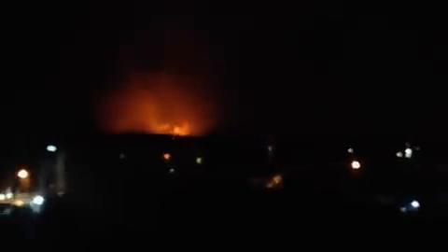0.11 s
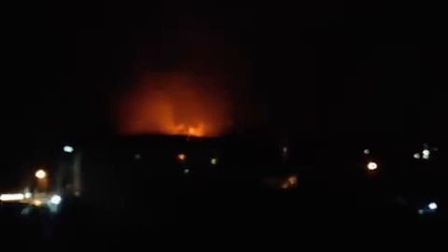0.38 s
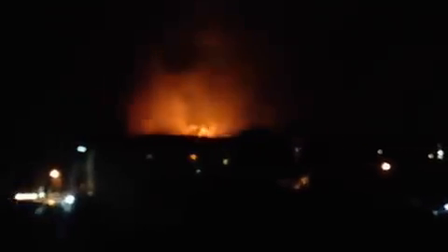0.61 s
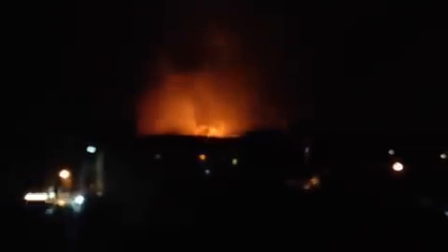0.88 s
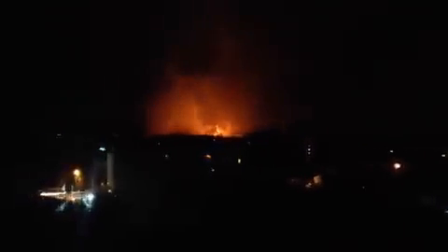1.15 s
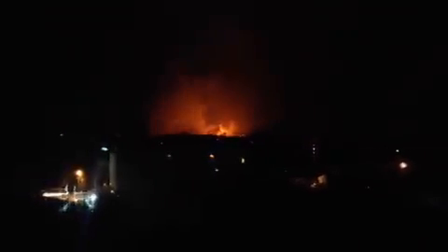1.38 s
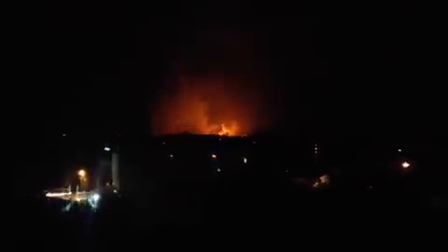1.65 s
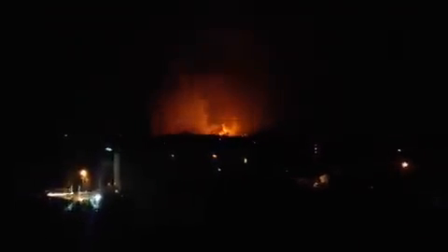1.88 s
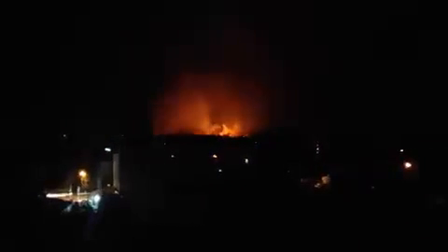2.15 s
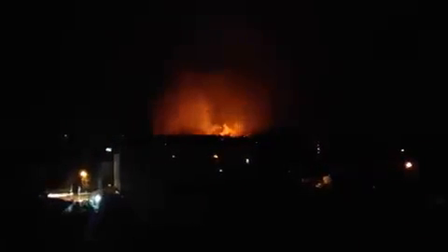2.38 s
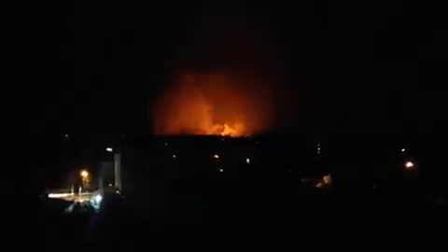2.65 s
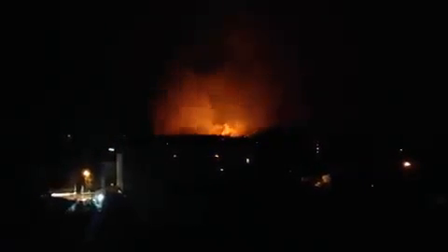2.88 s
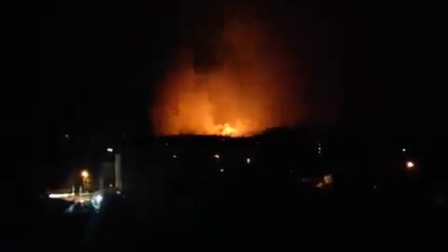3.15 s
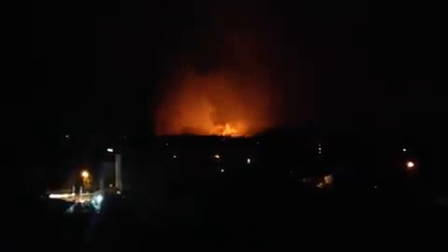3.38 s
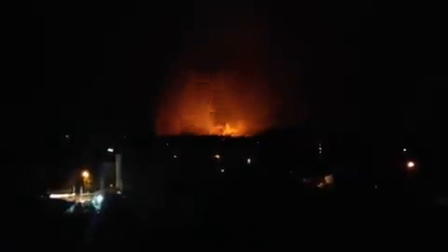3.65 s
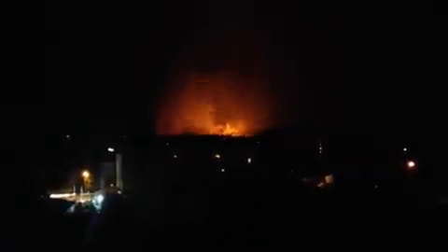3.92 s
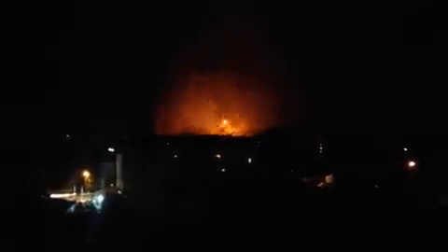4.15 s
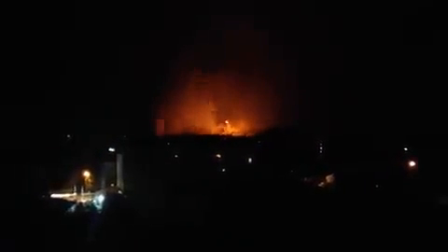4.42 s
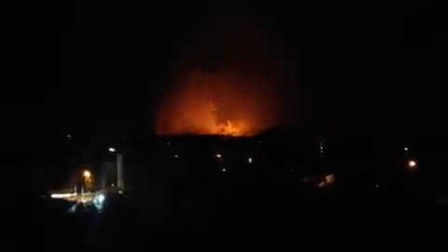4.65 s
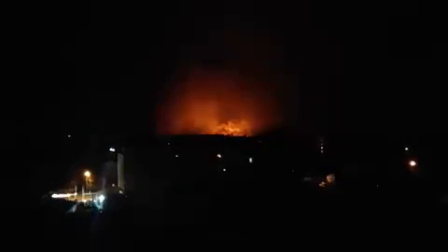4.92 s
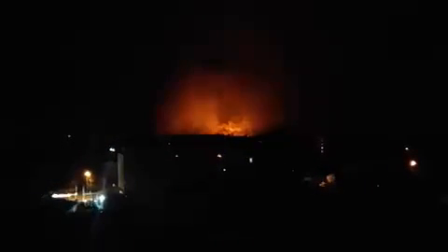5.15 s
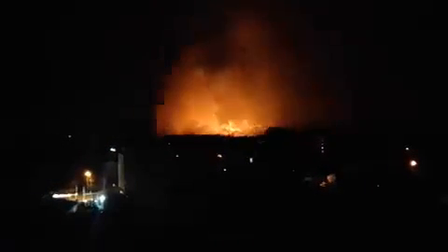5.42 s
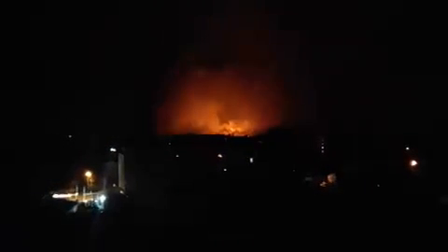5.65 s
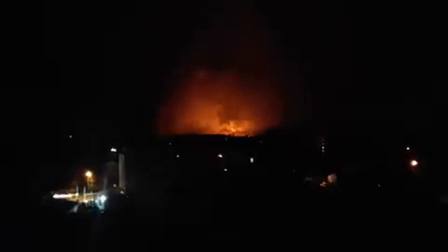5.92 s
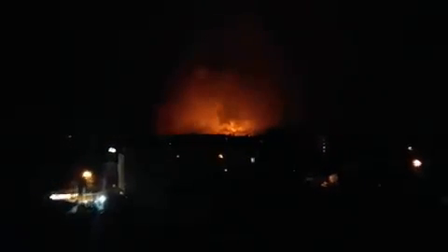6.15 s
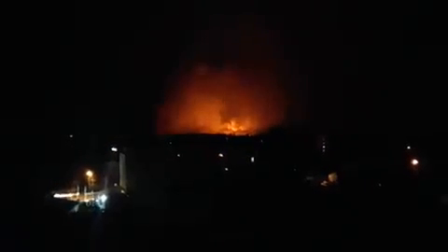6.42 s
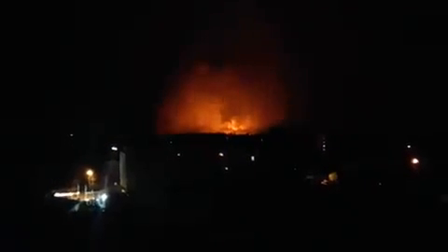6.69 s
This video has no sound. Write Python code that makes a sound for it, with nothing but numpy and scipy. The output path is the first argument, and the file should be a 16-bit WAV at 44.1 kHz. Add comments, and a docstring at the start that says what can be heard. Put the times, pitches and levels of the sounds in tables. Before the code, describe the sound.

Ammunition explodes continuously in a large distant fire at night. A rolling, muffled roar of countless small bangs runs throughout, with irregular sharp cracks and deep booms on top. The first second or so is heaviest and most rumbling; after two seconds the bass thins and crackling leads. The loudest blasts clip a small handheld microphone far away across open ground; a few tiny close ticks end it.

```python
"""Ammunition burns and goes off in a large fire far away, at night, heard over open ground by a small camera.
From the start, sharp cracks and deep booms stand out of a rolling roar of countless smaller bangs and echoes;
the crackle is brightest near 0.35 s, and the loudest blasts overload the microphone.
Near 1.9 s the large calibres burn down and the rumble sinks under the crackle. Faint hiss swells now and then;
after the last cracks, from 6.68 s, come a few faint ticks close by. Blasts are filtered pulses with scattered echoes."""
import sys
import numpy as np
from scipy import signal
from scipy.io import wavfile

SR = 44100
rng = np.random.default_rng(int(sys.argv[2]) if len(sys.argv) > 2 else 0)


def how_loud(loudness_db):
    """Turn decibels into a plain amplitude multiplier (0 dB gives 1, 20 dB gives 10)."""
    steps = np.asarray(loudness_db, float) / 20
    return 10 ** steps


def wrap_up_sound(samples):
    """Save the sound to the file named by the first command line argument, as 16-bit audio."""
    columns = np.atleast_2d(samples).T
    # keep every value between -1 and 1, then stretch to whole-number steps
    tamed = np.clip(columns, -1, 1)
    steps = np.round(tamed * 32767).astype(np.int16)
    wavfile.write(sys.argv[1], SR, steps)


N = 299829  # samples

# single cracks: onset [t/s], peak of the direct blast [level/dB], centre [f/Hz],
# 60 dB decay of the scattered echoes [t/s], echoes against the blast [level/dB]
CRACK_EVENTS = [(0.031, -22.5, 534, .098, 6), (.335, -13.5, 855, .15, 1.5), (.358, -10, 1060, 0.075, -5),
                (.398, -3, 1070, .1, -5.5), (0.507, -5.5, 990, 0.029, -3.5), (.746, -16.5, 244, .13, 1),
                (.843, -11, 349, 0.064, 4.5), (0.885, -20, 1300, 0.054, 4), (.942, -10.5, 297, 0.048, 3.5),
                (1.144, -19.5, 400, 0.1, 2), (1.303, 4.5, 900, 0.059, -6.5), (1.466, -20, 264, .12, 3),
                (1.509, -19.5, 270, 0.067, 5.5), (1.752, -10, 927, 0.072, -2.5), (1.804, -17, 850, .42, -3),
                (1.866, -9, 900, .18, -7), (1.900, -21, 900, .099, 6.5), (1.995, -17, 870, 0.21, -2.5),
                (2.068, -7.5, 797, .075, 4), (2.072, -4.5, 535, 0.075, 1), (2.117, -9.5, 530, 0.072, -4.5),
                (2.208, -10, 1000, 0.079, 0), (2.368, -13, 398, 0.14, -3.5), (2.414, -16.5, 552, 0.21, -5),
                (2.721, -15, 910, .12, -1.5), (2.800, -6, 784, .11, -13), (2.826, -4.5, 950, 0.032, -3),
                (2.969, -17, 918, 0.034, -4), (2.997, -14, 547, 0.073, 1), (3.02, -11.5, 800, 0.038, -11),
                (3.051, -6.5, 915, 0.077, 1), (3.210, -18, 820, .064, 1.5), (3.513, -20.5, 510, 0.24, -0.5),
                (3.641, -8, 930, .2, -10), (3.812, -4.5, 450, 0.036, -9.5), (3.901, -5.5, 517, 0.056, 5),
                (4.062, -15.5, 560, 0.16, 0), (4.255, -20.5, 541, 0.17, 3.5), (4.459, -19, 526, 0.072, 1.5),
                (4.656, -9.5, 400, 0.15, 3.5), (4.660, -5, 1900, 0.068, -1.5),
                (5.054, -12.5, 354, 0.17, -11), (5.219, -22, 500, 0.1, -5), (5.730, -5, 366, 0.12, -1),
                (6.128, -16.5, 395, 0.34, -4.5), (6.166, -13.5, 298, 0.15, 2), (6.447, -20.5, 300, 0.44, 3),
                (6.505, -15, 600, .11, -0.5), (6.618, -24, 800, 0.098, 4), (6.635, -15, 950, 0.049, 0.5)]
# deep booms: onset [t/s], peak of the direct blast [level/dB], centre [f/Hz],
# 60 dB decay of the scattered echoes [t/s]
BOOM_EVENTS = [(0.158, -19, 126.6, 0.15), (.397, -3.5, 147, .36), (.747, -9.5, 175, 0.17),
               (.839, 1.5, 122, .15), (1.094, -12, 126, 0.26), (1.14, -6.5, 189, 0.25),
               (1.190, -7, 170, 0.37), (1.918, -17, 107.2, 0.11), (2.068, -15.5, 100.7, .13),
               (2.401, -24, 225, .4), (3.505, -15, 82, .18), (4.654, -19, 80.6, 0.13),
               (4.968, -27, 69, 0.14), (6.164, -11.5, 126, 0.31), (6.446, -15.5, 206, 0.21),
               (6.5, -13.5, 241, 0.64)]
# how fiercely the unseparated small bangs go off: [t/s], [level/dB]
CRACKLE_LEVEL = [(0, -27.5), (.13, -27), (.3, -29), (.68, -29.5), (1.2, -25), (1.5, -30), (1.74, -27.5),
                 (1.95, -22.5), (2.16, -25.5), (2.46, -28), (3.37, -30.5), (3.8, -26.5), (4.45, -31.5),
                 (5.09, -31), (5.6, -32.5), (6.0, -30.5), (6.36, -30), (6.8, -30)]
# colour left by distance, ground and microphone: [f/Hz], [level/dB]
PATH_COLOUR = [(15, -31), (25, -14), (50, -11), (103, -7), (281, -3.5), (373, -2), (421, -5), (536, 0.5),
               (711, -11), (787, -5), (962, -4), (1180, -6.5), (1360, -12.5), (1870, -12), (2450, -25.5),
               (3100, -24), (4030, -37), (4700, -56), (9000, -95)]
# faint ticks close to the microphone: onset [t/s], peak [level/dB]
CLOSE_TICKS = [(6.682, -44.5), (6.700, -37), (6.709, -56), (6.720, -53), (6.759, -60)]
# relative spectrum of the hiss, also the colour of the ticks: [f/Hz], [level/dB]
HISS_COLOUR = [(1500, -38), (4000, 3.5), (5500, -2.5), (9000, -4), (9800, -23), (16000, -48.5)]
# swells of the hiss: crest [t/s], rms at the crest [level/dB], time constant of the power's fade [t/s]
HISS_SWELLS = [(0, -60.5, 0.44), (1.8, -70.5, 0.22), (3.051, -67, 0.029), (4.45, -72, 0.1),
               (6.28, -69, 0.045)]


def cracks():
    """Sharp single blasts, whose pulses fall gently in level above their centre."""
    rows = [(*row, 3.5) for row in CRACK_EVENTS]  # 3.5 dB an octave above the centre
    return blasts(rows, below_db=6.96, echoes_per_s=1200, front_cycles=0.056, rise_s=0.002)


def booms():
    """Deep blasts; a weak one is half hidden, so more of it arrives as echoes."""
    full_scale_echo_db, echo_db_per_db_weaker = -8, 0.3954
    rows = []
    for start_s, peak_db, centre_hz, t60 in BOOM_EVENTS:
        echo_db = full_scale_echo_db - echo_db_per_db_weaker * peak_db
        rows.append((start_s, peak_db, centre_hz, t60, echo_db, 12.5))  # 12.5 dB an octave above the centre
    return blasts(rows, below_db=7.7, echoes_per_s=250, front_cycles=0.086, rise_s=0.0059)


def blasts(rows, below_db, echoes_per_s, front_cycles, rise_s):
    """Each blast is a pressure pulse and its own scatter of echoes, which build for a few ms."""
    out = np.zeros(N + SR)
    for start_s, peak_db, centre_hz, t60, echo_db, above_db in rows:
        pulse = causal(peaked(centre_hz, below_db, above_db))
        front, echoes = scatter(t60, echo_db, echoes_per_s, front_cycles / centre_hz, rise_s)
        direct = signal.fftconvolve(front, pulse)
        scattered = signal.fftconvolve(echoes, pulse)
        sound = direct / abs(direct).max() + scattered / abs(pulse).max()
        out[round(start_s * SR):][:len(sound)] += how_loud(peak_db) * sound
    return out[:N]


def scatter(t60, echo_db, per_s, front_s, rise_s):
    """A front rounded by the long path, and echoes of either sign from ground and buildings, one a time slot."""
    t = np.arange(SR // 2) / SR
    slots = np.arange(0, t[-1] - 1 / per_s, 1 / per_s)
    draw = rng.random((len(slots), 2))
    arrivals = ((slots + draw[:, 0] / per_s) * SR).astype(int)
    echoes = np.zeros(len(t))
    echoes[arrivals] = np.sign(draw[:, 1] - .5)
    build_up = 1 - np.exp(-(t / rise_s) ** 2)
    echoes *= how_loud(echo_db - 60 * t / max(t60, .02)) * build_up
    front = t * np.exp(-t / front_s)
    return front / np.linalg.norm(front), echoes


def roar():
    """Crackle of small calibres over the rumble of large ones; a nearer flurry carries more treble."""
    t = np.arange(N) / SR
    crackle_db = np.interp(t, *np.transpose(CRACKLE_LEVEL))
    # the large calibres lead at first, then burn down: rumble against crackle
    heavy_db, spent_db, spent_at_s, spent_over_s = 3.5, -4.5, 1.865, .08
    still_heavy = (1 - np.tanh((t - spent_at_s) / spent_over_s)) / 2
    rumble_db = crackle_db + spent_db + (heavy_db - spent_db) * still_heavy
    # the flurry brightens the crackle for a moment
    usual_treble_db, flurry_db, flurry_at_s, flurry_wide_s = -0.35, 11.5, .35, 0.31
    treble_db = usual_treble_db + flurry_db * np.exp(-((t - flurry_at_s) / flurry_wide_s) ** 2)
    crackle = swarm(60, 2.82, 0.37, (400, 600, 950, 1300, 1800), below_db=7.65, above_db=5.56)
    rumble = swarm(25, 1.5, 0.24, (55, 75, 104, 126, 170, 230), below_db=4.3, above_db=12.1)
    body = signal.sosfiltfilt(signal.butter(2, 1450, fs=SR, output="sos"), crackle)
    treble = crackle - body
    return how_loud(crackle_db) * (body + how_loud(treble_db) * treble) + how_loud(rumble_db) * rumble


def swarm(per_s, spread_db, t60, centres_hz, below_db, above_db):
    """Many small bangs at random moments, a few larger; each calibre has its own colour and echoes."""
    size = N + SR // 2  # already going before the start
    total = np.zeros(size)
    for centre_hz in centres_hz:
        draw = rng.random((size, 2))
        extra_db = spread_db * np.minimum(-np.log(1 - draw[:, 0]), 4)
        goes_off = draw[:, 1] < per_s / SR
        bangs = how_loud(extra_db) * goes_off
        front, echoes = scatter(t60, echo_db=-2.5, per_s=3000, front_s=.0001, rise_s=0.00063)
        bang = signal.fftconvolve(front + echoes, causal(peaked(centre_hz, below_db, above_db)))
        total += signal.oaconvolve(bangs, bang)[:size]
    return unit_rms(total[-N:])


def ticks():
    """Dry high clicks close by: noise bursts that die away in a millisecond or two."""
    t = np.arange(200) / SR
    out = np.zeros(N + SR)
    colour = causal(lambda hz: read(HISS_COLOUR, hz))
    for start_s, peak_db in CLOSE_TICKS:
        burst = rng.standard_normal(len(t)) * np.exp(-t / 0.00075)
        tick = np.convolve(burst, colour)
        out[round(start_s * SR):][:len(tick)] += how_loud(peak_db) * tick / abs(tick).max()
    return out[:N]


def hiss():
    """Faint high noise, coloured from white noise, whose power swells now and then."""
    t = np.arange(N) / SR
    floor_db, rise_s = -72.5, .04
    power = how_loud(floor_db) ** 2
    for crest_s, db, fade_s in HISS_SWELLS:
        swell = np.exp(np.where(t < crest_s, (t - crest_s) / rise_s, (crest_s - t) / fade_s))
        power = power + how_loud(db) ** 2 * swell
    colour = causal(lambda hz: read(HISS_COLOUR, hz))
    noise = signal.oaconvolve(rng.standard_normal(N), colour)[:N]
    return np.sqrt(power) * unit_rms(noise)


def peaked(centre_hz, below_db, above_db):
    """Spectrum of a blast: the path colour, falling away on both sides of the centre by dB an octave."""
    def shape(hz):
        octaves = np.log2((hz + 5) / centre_hz)
        slope = np.where(octaves < 0, -below_db, above_db)
        return read(PATH_COLOUR, hz) - slope * octaves
    return shape


def causal(shape, size=4096):
    """Minimum-phase pulse whose spectrum in dB is shape(Hz), so its energy comes as early as it can."""
    hz = abs(np.fft.fftfreq(size, 1 / SR))
    log_gain = np.maximum(shape(hz), -130) * np.log(10) / 20
    spectrum = np.exp(np.conj(signal.hilbert(log_gain)))
    return np.fft.ifft(spectrum).real[:size // 2]


def read(points, hz):
    """Level in dB at hz, interpolated along log frequency."""
    f, level_db = np.transpose(points)
    return np.interp(np.log(hz + 1), np.log(f + 1), level_db)


def unit_rms(x):
    """Scales a sound to an rms of 1."""
    return x / np.sqrt(np.mean(x ** 2) + 1e-20)


def scene():
    """The far fire over open ground and the faint near sounds, at one microphone."""
    return (cracks() + booms() + roar() + ticks() + hiss())[None]


def top_cut(x):
    """Nothing passes above the cut-off."""
    return signal.sosfilt(signal.butter(12, 16000, fs=SR, output="sos"), x)


def record(dry):
    """The microphone's input stage flattens the tops of the loudest blasts with a hard knee."""
    overload = .71  # of full scale
    flat = dry / (1 + abs(dry / overload) ** 30) ** (1 / 30)
    return top_cut(flat)


dry = scene()
out = record(dry)
wrap_up_sound(out)
```